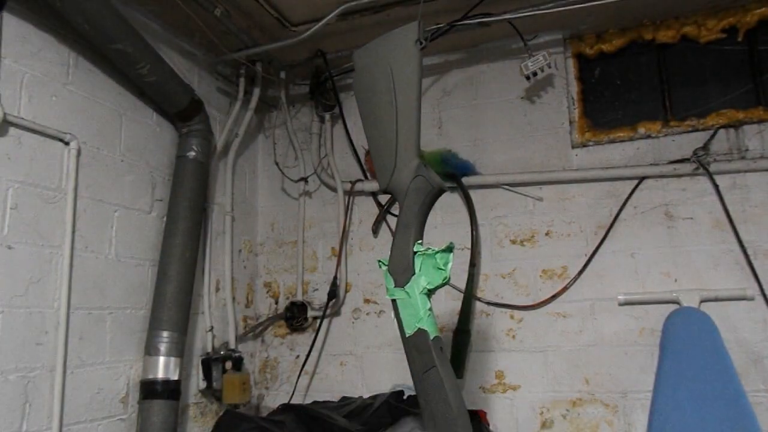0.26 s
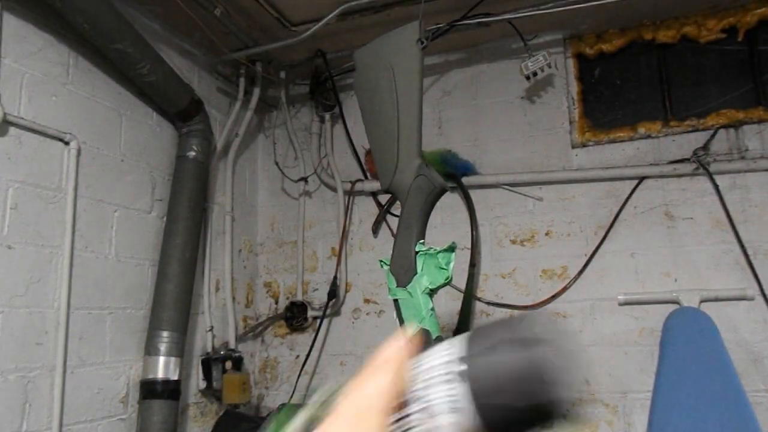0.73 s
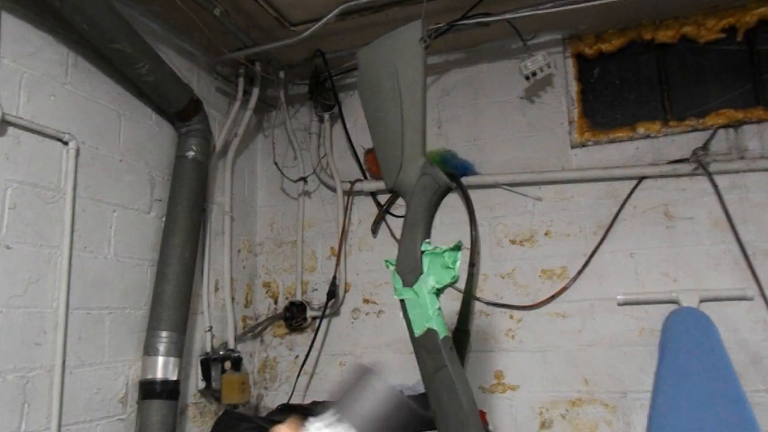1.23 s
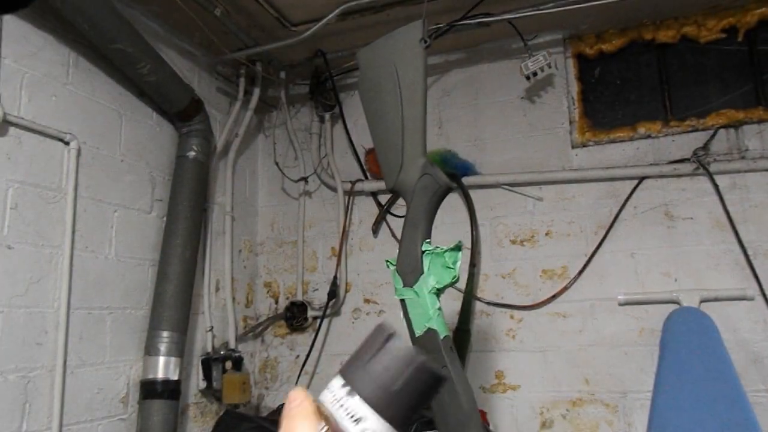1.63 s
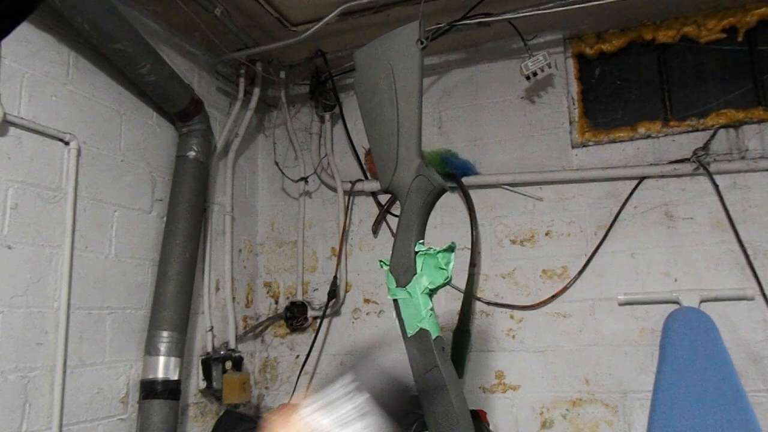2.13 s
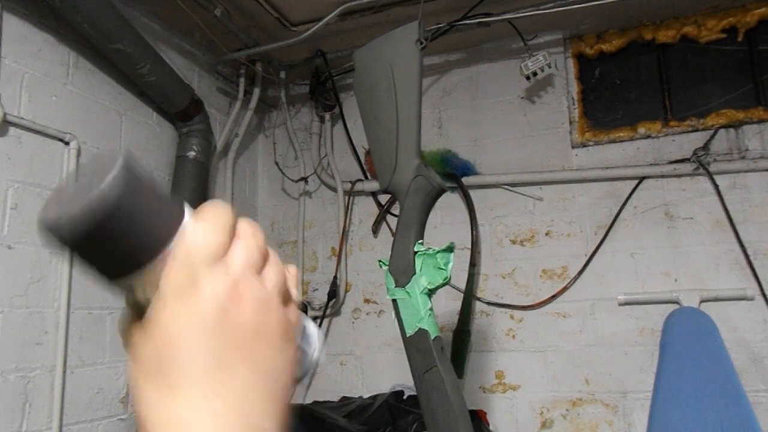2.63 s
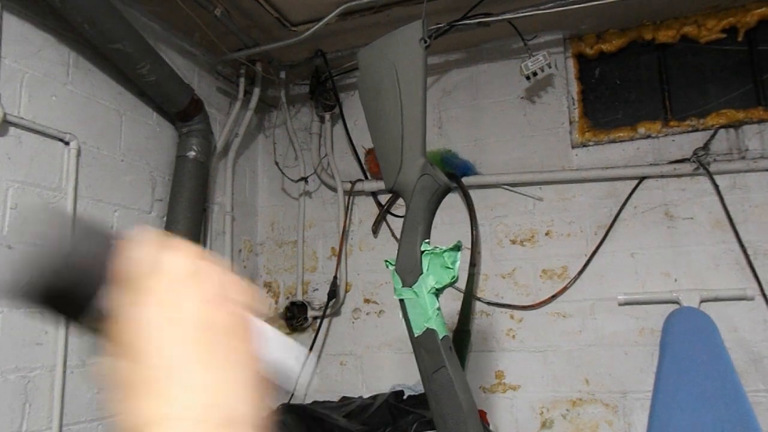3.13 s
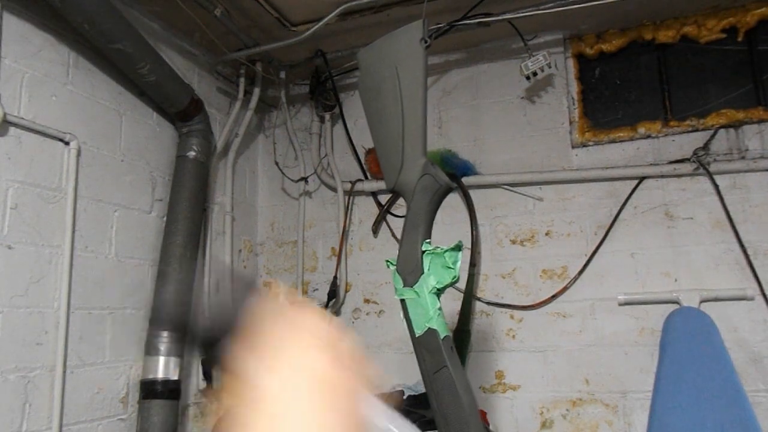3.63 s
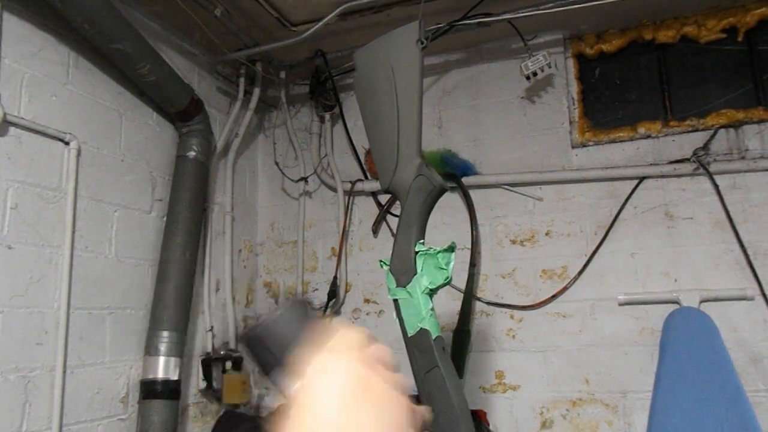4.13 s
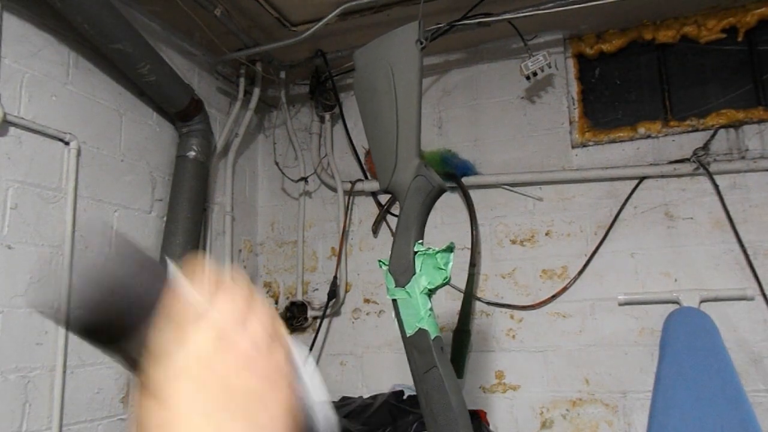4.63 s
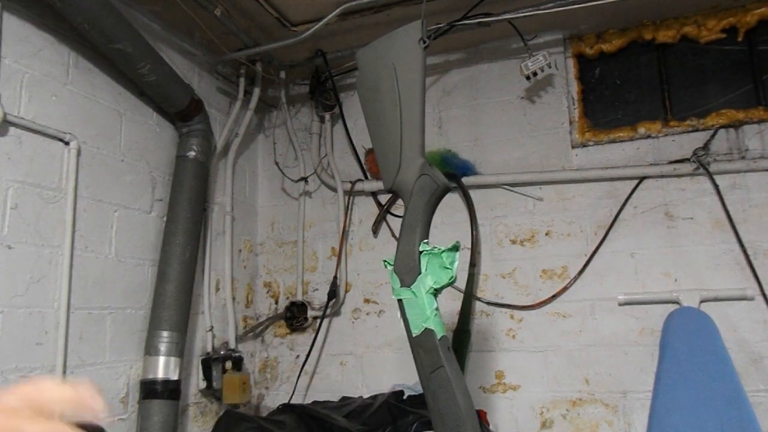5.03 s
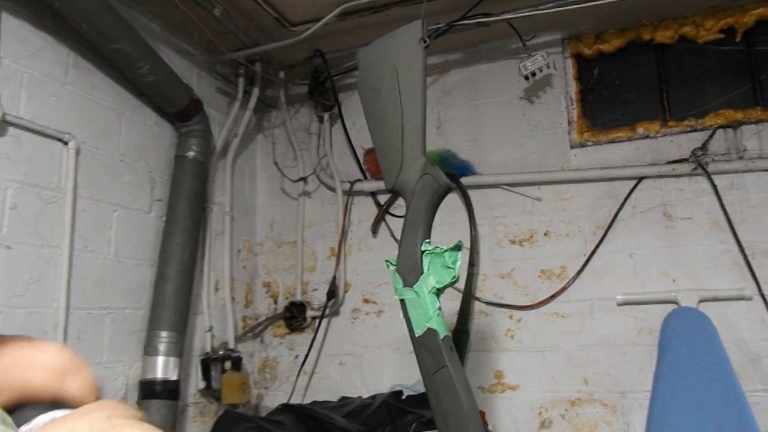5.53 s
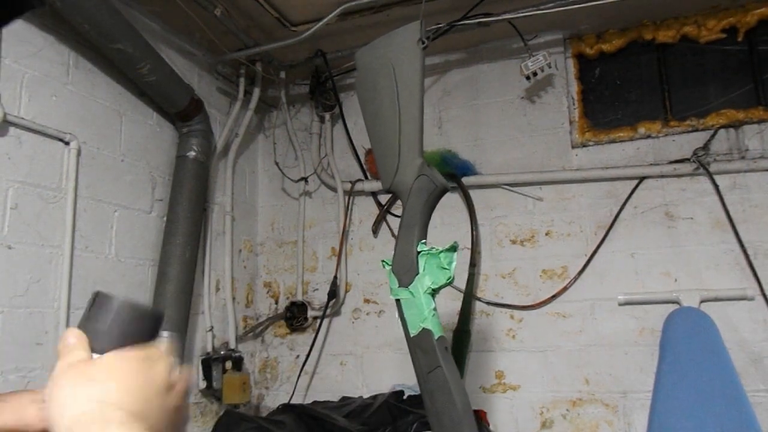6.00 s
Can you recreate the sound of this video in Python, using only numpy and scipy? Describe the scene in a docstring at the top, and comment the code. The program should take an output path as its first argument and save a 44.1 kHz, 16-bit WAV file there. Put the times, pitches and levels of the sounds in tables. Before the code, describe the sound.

In a small hard-walled basement, with faint steady hiss and a trace of hum, a spray paint can is shaken close to the microphone. From 0 to 1.5 seconds the metal ball slams the steel bottom about three times a second, with lighter knocks from the top between and quick skittering taps; the hardest cracks are slightly overloaded. Around 1.7 seconds a sleeve rustles and the rattle thins to light taps and thin pings. A short double blow comes at 2.4, then scattered taps until 3.2. A second vigorous run lasts from 3.25 to 4.8, each blow ringing briefly with close echoes and a short room tail. Small liquid gulps slide slightly upward among the blows. Weak taps end near 5.1; tiny dry clicks follow from 5.2 to 5.45, then a soft cloth swish at 5.55 and a longer faint one around 6, leaving the quiet hiss.

```python
"""Shaking a spray paint can

A spray paint can is shaken by hand close by in a small basement, over faint hiss and hum.
A sleeve rustles: noise in two colours swells now and then as the arm moves.
The ball strikes the steel ends and skitters in quick runs: short cracks, ringing modes, echoes and a room tail.
Gas pockets gulp in the paint as short sliding tones; a few small dry clicks of damped modes follow the shaking."""
import sys
import numpy as np
from scipy import signal
from scipy.fft import rfft, irfft, next_fast_len
from scipy.io import wavfile
from scipy.ndimage import uniform_filter1d, map_coordinates

SR = 44100
rng = np.random.default_rng(int(sys.argv[2]) if len(sys.argv) > 2 else 0)


def to_wav(s):
    """Save 16-bit WAV."""
    ch = np.atleast_2d(s).T  # columns
    pcm = np.round(np.clip(ch, -1, 1) * 32767)  # PCM
    wavfile.write(sys.argv[1], SR, pcm.astype(np.int16))


N = 275933  # length of the scene in samples


def amp(db):
    """Turn decibels into a plain factor."""
    return 10 ** (np.asarray(db) / 20)


def unit(x):
    """Scale to rms 1."""
    return x / np.sqrt(np.mean(x ** 2) + 1e-20)


def packet(x):
    """Scale to energy 1."""
    return x / np.linalg.norm(x)


def add(out, start_s, sound):
    """Mix a sound in at the given time."""
    start = max(round(start_s * SR), 0)
    out[start:start + len(sound)] += sound


def along(points, hz):
    """Read a curve of (Hz, value) points on a log pitch axis."""
    point_hz, value = np.transpose(points)
    return np.interp(np.log(hz + 1), np.log(point_hz), value)


def noise(spectrum):
    """Noise of rms 1 with the given colour."""
    size = next_fast_len(N)
    white = rfft(rng.standard_normal(size))
    gain = amp(along(spectrum, np.fft.rfftfreq(size, 1 / SR)))
    return unit(irfft(white * gain, size)[:N])


def causal(db):
    """The minimum-phase response with these gains: a filter that answers as early as it can."""
    cepstrum = irfft(np.log(amp(db)))
    half = len(cepstrum) // 2
    cepstrum[1:half] *= 2
    cepstrum[half + 1:] = 0
    return np.exp(rfft(cepstrum))


def ripple(hz, per_octave, depth_db):
    """A random run of peaks and dips (dB) that keeps the energy of broad bands nearly even."""
    knots = depth_db * rng.standard_normal(96)
    knots = knots - 10 * np.log10(uniform_filter1d(amp(knots) ** 2, size=5))
    return map_coordinates(knots, [np.log2(1 + hz / 300) * per_octave], mode="mirror")


def ring(modes, t, scatter_db, detune):
    """Ways an object can vibrate, each a dying sine; every blow excites and tunes them differently."""
    hz, db, t60 = np.transpose(modes)[:, :, None]
    size, shift = rng.standard_normal((2, len(modes), 1))
    decay = amp(db + scatter_db * size - 60 * t / t60)
    return np.sum(decay * np.sin(2 * np.pi * hz * (1 + detune * shift) * t), axis=0)


def room_tail(t, onset, clump_db=9.5):
    """Answer of the basement: clumped reflections at first, then a smooth decay."""
    # time to fall by 60 dB: pitch_hz, decay_s
    room_decay = [(300, 0.21), (1000, 0.24), (2000, 0.22), (4000, 0.24), (6000, 0.24), (12000, 0.18)]
    hz, s, grid = signal.stft(rng.standard_normal(len(t)), SR, nperseg=256)
    fade = amp(-60 * s / along(room_decay, hz)[:, None])  # each pitch dies at its own pace
    tail = signal.istft(grid * fade, SR, nperseg=256)[1][:len(t)]
    lumps = unit(uniform_filter1d(rng.standard_normal(len(t)), size=48))
    clumps = clump_db * lumps * np.exp(-10 * t)
    return packet(tail * amp(clumps) * (1 - np.exp(-(t / onset) ** 2)))


def background(hiss_db):
    """Steady coloured noise with a trace of mains hum, made of sines."""
    # colour of the hiss: pitch_hz, relative_level_db (per Hz)
    air = [(15, -50), (25, -33), (76, -28), (108, -21), (190, -18.5), (354, -12), (516, -2.5), (591, -8),
           (818, -1), (1020, -6), (1650, -7), (2610, -13.5), (5730, -11.5), (7710, -26), (16000, -35.5)]
    # hum tones: pitch_hz, rms_level_db
    hum_tones = [(119, -87), (360, -77)]
    t = np.arange(N) / SR
    hum = sum(amp(db) * np.sqrt(2) * np.sin(2 * np.pi * (hz * t + rng.random())) for hz, db in hum_tones)
    return amp(hiss_db) * noise(air) + hum


def sleeve(grain_db):
    """Cloth folds and rubs as the arm moves, in uneven grains."""
    # rustles of the sleeve: middle_s, length_s, cloth_level_db, swish_level_db
    rustles = [(0.043, 0.18, -56.5, -71), (0.19, 0.081, -63, -41.5), (1.7, 0.15, -49.5, -52),
               (2.785, 0.1, -68, -49.5), (3.428, 0.12, -46.5, -51), (4.059, 0.053, -50.5, -58),
               (4.152, 0.14, -59.5, -55), (5.556, .09, -76, -51), (6.003, 0.46, -75, -55)]
    # colour of the dull rubbing: pitch_hz, relative_level_db (per Hz)
    cloth_colour = [(60, -48), (140, -26), (210, 0.5), (330, -5.5), (520, 3.5), (900, -6), (2500, -10),
                    (16000, -66)]
    # colour of the brighter swish: pitch_hz, relative_level_db (per Hz)
    swish_colour = [(100, -56), (700, -5), (2200, -0.5), (6000, 1), (9000, -11.5), (16000, -38)]
    t = np.arange(N) / SR
    cloth, swish = np.zeros((2, N))
    for middle_s, length_s, cloth_db, swish_db in rustles:
        swell = np.exp(-(2 * (t - middle_s) / length_s) ** 2)
        cloth += amp(cloth_db) * swell
        swish += amp(swish_db) * swell
    wander = unit(uniform_filter1d(rng.standard_normal(N), size=500))
    grain = unit(amp(grain_db * wander))
    return grain * (cloth * noise(cloth_colour) + swish * noise(swish_colour))


def contacts():
    """The ball strikes, falls back, taps, grazes and skitters: (s, level dB, zone colour dB, direct dB)."""
    # slams into the bottom, about three strokes a second, some with a rebound:
    # start_s, level_db, direct_db, dome_db, tick_db
    blows = [(.196, 8, 2, -8, 14.5), (0.5014, 14, -0.5, -1.5, 0.5), (.5178, 0, 12, 0, -3),
             (0.5269, 8, 0, -1, 8.5), (0.8595, 12.5, 2.5, -13, 2.5), (0.8869, 11, 2, -2, 4),
             (1.159, 14, -1, 1.5, 7.5), (1.163, 4.5, 7.5, -5, 5), (1.4675, 13, 1.5, -3.5, 4.5),
             (2.391, 8, 5, -4, 4), (2.418, 6.5, 5, -5, 4), (3.248, 5, 6.5, 1.5, 9),
             (3.2522, 12, 3.5, -2.5, -19), (3.476, 14, 0, 0.5, 6.5), (3.4959, 7.5, 6.5, -1, 8),
             (3.773, 11, 8.5, -18, 11.5), (3.7894, 12.5, -2.5, -2.5, 5.5), (4.089, 11.5, 2, -8, 10),
             (4.3372, 10.5, 4, -26, 9.5), (4.341, 12.5, 2, -13, -0.5), (4.6526, 11, 4, -3.5, 3),
             (4.6809, 7.5, 2, -3, 2), (4.696, 7, 2.5, 0, 5)]
    # half a stroke later, lighter falls back against the top: start_s, level_db, knock_db, rim_db
    returns = [(0.3403, 2.5, 5.5, 5), (.633, 0.5, 12.5, 8), (0.9622, 2.5, 16, 12), (1.3115, 3, 9.5, 1.5),
               (2.2259, 3, 6.5, 2.5), (2.5048, -2, 21, 9), (2.509, -2.5, 11, 13.5), (3.345, 1.5, 14.5, 8.5),
               (3.6298, -0.5, 12, 1), (3.6341, -3, 17.5, 10.5), (4.196, 3, 15, 1), (4.2032, -6.5, 1, 16.5),
               (4.484, 0, 18.5, 12), (4.8002, -3, 23, 9.5), (4.808, -7, 10, 10)]
    # glancing taps along the can's wall: start_s, level_db, knock_db
    wall_taps = [(.002, -14.5, 18), (.151, -15, 17), (.2323, -5, 16.5), (.2522, -8, 26), (.268, -9, 14),
                 (.4517, -8, 19), (.491, -3, 13), (.5474, -9.5, 27), (.723, -11, 13.5), (.841, -6, 19.5),
                 (1.02, -9.5, 12), (1.2386, -7.5, 22), (1.418, -16.5, 26), (1.513, -16, 29.5),
                 (1.76, -14.5, 10), (2.064, -9, 23.5), (2.32, -9.5, 20), (2.3705, -7.5, 23.5),
                 (2.4031, -7.5, 18), (2.4394, -5.5, 15.5), (2.594, -11.5, 22.5), (2.685, -17.5, 24),
                 (2.718, -14, 14), (3.0298, -14.5, 26), (3.0785, -5, 14), (3.092, -7.5, 19),
                 (3.156, -7.5, 22), (3.335, -9, 27.5), (3.4631, -20, 25.5), (3.5749, -3, 17.5),
                 (3.6609, -14, 26), (3.695, -14.5, 19), (3.8497, -2.5, 15.5), (3.919, -9.5, 20.5),
                 (4.13, -1.5, 10), (4.155, -9.5, 23), (4.2724, -9.5, 19.5), (4.3335, -5.5, 29),
                 (4.418, -10, 24), (4.558, -7, 18), (4.7125, -7, 22.5), (4.747, -15.5, 23),
                 (4.999, -14.5, 30), (5.0529, -18, 25.5), (5.0832, -16, 20.5)]
    # thin pings as the ball grazes bare steel: start_s, level_db
    pings = [(.079, -14), (1.988, -7.5), (2.117, -6), (2.864, -14), (2.998, -7)]
    # basic colour of each kind of contact: one level_db each for knock, dome, wall, rim, tick
    blow_colour = [-6, 0, -0.5, -0.5, -1]
    return_colour = [1, -3.5, 0.5, -0.5, 11]
    tap_colour = [0.5, -0.5, -1.5, 5.5, 9]
    ping_colour = [-8, -26, -1, -1.5, -27]
    # how far each part's sound reaches into those five zones: one share each (0 to 1)
    knock = np.array([0.98, 0.57, 0.017, 0.073, 0.15])
    dome = np.array([0, 0.82, 0.016, 0.024, 0.061])
    rim = np.array([0, 0.018, 0, 0.86, .1])
    tick = np.array([0, 0.14, 0, 0.19, 0.91])
    # the shifting grip leaves the dome more or less free to ring: time_s, dome_db
    grip = [(.2, 3.5), (1.3, 3), (2.3, -0.5), (3.6, -0.5), (5, 2)]
    tap_direct_db = 2.5  # direct sound of every contact but the blows
    first_s, gap_s = .045, 0.02  # from blow to first skitter touch, and between touches; both vary
    under_db, loss_db, skitter_knock_db = -29.5, 6.5, 20.5  # below the blow, lost per touch, knock

    # three skitter touches follow each blow, weaker and weaker on the whole
    taps = list(wall_taps)
    for s, db, *_ in blows:
        gaps, sizes = rng.standard_normal((2, 3))
        times = s + first_s + np.cumsum(gap_s * np.exp(.3 * gaps)) - gap_s
        for k, touch_s in enumerate(times):
            touch_db = db + under_db - loss_db * k + 2 * sizes[k]
            taps.append((touch_s, touch_db, skitter_knock_db))

    rows = []
    for s, db, direct_db, dome_db, tick_db in blows:
        rows.append((s, db, blow_colour + dome_db * dome + tick_db * tick, direct_db))
    for s, db, knock_db, rim_db in returns:
        rows.append((s, db, return_colour + knock_db * knock + rim_db * rim, tap_direct_db))
    for s, db, knock_db in taps:
        rows.append((s, db, tap_colour + knock_db * knock, tap_direct_db))
    for s, db in pings:
        rows.append((s, db, ping_colour, tap_direct_db))
    grip_s, grip_db = np.transpose(grip)
    return [(s, db, zone_db + np.interp(s, grip_s, grip_db) * dome, direct_db)
            for s, db, zone_db, direct_db in rows]


def burst(t, life):
    """Spectrum of the thin steel's dense, quickly dying modes, even in broad bands."""
    spectrum = rfft(rng.standard_normal(len(t)) * np.exp(-t / life))
    power = uniform_filter1d(np.abs(spectrum) ** 2, size=1400)
    return spectrum / np.sqrt(np.abs(power) + 1e-12)


def ball(gain_db, room_db, steel_db, soft_life, hard_life, ripple_db, echo_db, size=16384):
    """Each contact cracks, rings the steel and echoes; where it lands sets its colour."""
    # where the knock, dome, wall, rim and tick sound: pitch_hz
    zone_hz = [900, 1900, 3600, 5900, 10000]
    # colour of the can under a hard blow: pitch_hz, relative_level_db (per Hz)
    shell_colour = [(88, -56), (150, -54), (923, -15.5), (1480, -8.5), (1940, -7), (3490, -1), (4160, -4),
                    (4670, -3), (5150, -4.5), (5680, -3), (8560, -26.5), (9260, -29.5), (11000, -35.5),
                    (14500, -41.5), (16000, -53)]
    # lasting modes of the steel, damped by paint and hand: pitch_hz, relative_level_db, decay_60db_s
    steel_modes = [(1760, -2, 0.36), (1966, 1.5, 0.21), (2116, -1, 0.24), (2540, 2.5, 0.1),
                   (3380, -25, 0.071), (4420, -10, 0.28), (4530, -3.5, 0.056), (5510, 4, 0.14),
                   (5680, -12, 0.23), (6260, -8, 0.28), (6030, 7, 0.13), (6430, 7, 0.12), (6230, -9, 0.13),
                   (10800, 9, 0.16)]
    # early echoes from near walls: delay_s, relative_level_db
    near_walls = [(.0045, -1.5), (.0087, -5), (0.0132, -8.5), (0.0187, -10)]
    # how strongly the can radiates into the room: pitch_hz, relative_level_db
    spread_colour = [(900, -6), (2200, -2.5), (6000, 0.5), (12000, 1)]
    # a square blow drives the whole can: pitch_hz, relative_level_db
    spike_colour = [(700, 8), (1800, -7), (3500, 3.5), (5300, -1), (12000, -3)]
    out = np.zeros(N + size)
    t, hz = np.arange(size) / SR, np.fft.rfftfreq(size, 1 / SR)

    def late(delay_s):
        """Delay a spectrum by turning its phases."""
        return np.exp(-2j * np.pi * hz * delay_s)

    lead = .002  # seconds of fade-in ahead of the contact
    fade = np.minimum(t / lead, 1) * np.minimum(10 * (1 - t / t[-1]), 1)
    walls = [amp(level + echo_db) * late(delay) for delay, level in near_walls]
    shell = along(shell_colour, hz)
    spread = causal(along(spread_colour, hz))
    spike = causal(along(spike_colour, hz))
    for s, db, zone_db, direct_db in contacts():
        # square, hard blows (1) release their energy in one short, broad spike; soft ones (0) do not
        square = np.clip((direct_db + .6 * db - 3) / 9, 0, 1)
        life = soft_life + square * (hard_life - soft_life)
        scattered = np.sqrt(1 - square ** 2) * burst(t, life) * late(0.000498)
        crack = amp(direct_db - 6.5) * (square * spike + scattered)
        echoes = sum(wall * burst(t, soft_life) for wall in walls)
        steel = amp(steel_db) * packet(ring(steel_modes, t, scatter_db=2.0, detune=0.01195))
        tail = amp(room_db) * room_tail(t, onset=0.0057, clump_db=2.5)
        # every spot on the can favours other modes, most of all under a light touch
        colour = shell + along(list(zip(zone_hz, zone_db)), hz)
        depth_db = ripple_db / (1 + amp(db - 6.5))
        colour = colour + ripple(hz, per_octave=9, depth_db=depth_db)
        spectrum = crack + spread * (echoes + rfft(steel + tail))
        sound = irfft(spectrum * causal(colour) * late(lead))
        add(out, s - lead, amp(db + gain_db) * sound * fade)
    return out[:N]


def paint(rise, attack, room_db):
    """Gas pockets ring briefly as the paint closes round them, rising a little in pitch."""
    # gulps in the sloshing paint: start_s, pitch_hz, level_db
    gulps = [(.233, 1080, -27.5), (.252, 1660, -18.5), (.548, 1690, -24), (.588, 1770, -21.5),
             (0.632, 1610, -15.5), (.745, 1780, -27), (1.022, 994, -29), (1.431, 1330, -28),
             (2.064, 997, -27), (2.227, 1330, -19), (3.848, 1840, -24), (4.129, 1740, -15),
             (4.712, 1760, -22), (5.015, 1720, -29), (5.099, 1720, -35), (5.541, 460, -42)]
    out, t = np.zeros(N + SR), np.arange(SR // 3) / SR
    for s, hz, db in gulps:
        t60 = 27.5 / hz  # about 27.5 cycles to fall by 60 dB
        pitch = hz * (1 + rise * np.minimum(t / t60, 1))
        phase = 2 * np.pi * np.cumsum(pitch) / SR
        gulp = amp(db - 60 * t / t60) * (1 - np.exp(-t / attack)) * np.sin(phase)
        answer = signal.fftconvolve(gulp, room_tail(t, onset=0.0056))[:len(t)]
        add(out, s, gulp + amp(room_db) * answer)
    return signal.sosfilt(signal.butter(2, 350, "highpass", fs=SR, output="sos"), out[:N])


def clicks(attack, snap_db, snap_life):
    """Tiny close clicks of damped modes and a noise snap, too weak to stir the room."""
    # small dry clicks: start_s, level_db, low_modes_db
    click_rows = [(5.209, -20, -1.5), (5.2248, -29.5, 8.5), (5.319, -29.5, -12), (5.3357, -22, 1),
                  (5.421, -36, 2), (5.4373, -25.5, 3.5)]
    # what the clicks ring with: pitch_hz, relative_level_db, decay_60db_s
    hollow = [(477, -14, 0.065), (1347, -1.5, 0.044), (1540, -11, 0.022), (2450, -4.5, 0.027),
              (2830, 4.5, 0.019), (3330, 3, 0.011), (5140, 7.5, 0.0067), (5660, 4.5, 0.0085),
              (8000, -2, 0.0089)]
    out, t = np.zeros(N + SR), np.arange(SR // 10) / SR
    for s, db, low_db in click_rows:
        # only modes below 3100 Hz take the low-mode level
        modes = [(hz, level + low_db * (hz < 3100), t60) for hz, level, t60 in hollow]
        snap = amp(snap_db) * rng.standard_normal(len(t)) * np.exp(-t / snap_life)
        body = ring(modes, t, scatter_db=3, detune=0.034)
        add(out, s, amp(db - 8.5) * (body + snap) * (1 - np.exp(-t / attack)))
    return signal.sosfilt(signal.butter(4, [400, 8200], "bandpass", fs=SR, output="sos"), out[:N])


def scene():
    """Mix all the sources; lives and attacks are in seconds."""
    air = background(hiss_db=-51.0)
    cloth = sleeve(grain_db=3.5)
    can = ball(gain_db=10, room_db=-4.5, steel_db=-11.5, soft_life=0.0018, hard_life=0.00043,
               ripple_db=2.7, echo_db=-6.5)
    slosh = paint(rise=0.029, attack=0.00035, room_db=-5.5)
    small = clicks(attack=0.00039, snap_db=-4.5, snap_life=0.0047)
    return (can + slosh + small + cloth + air)[None]


def record(dry):
    """The hardest cracks overload the recorder, which thins the bass and keeps nothing above its band limit."""
    low_cut_hz, top_hz = 84, 16200
    size = next_fast_len(N + SR // 2)
    hz = np.fft.rfftfreq(size, 1 / SR)
    low_cut = 1j * hz / (low_cut_hz + 1j * hz)  # gentle bass roll-off
    clipped = np.clip(dry, -1, 1)
    return irfft(rfft(clipped, size) * low_cut * (hz < top_hz), size)[..., :N]


dry = scene()
out = record(dry)
to_wav(out)
```